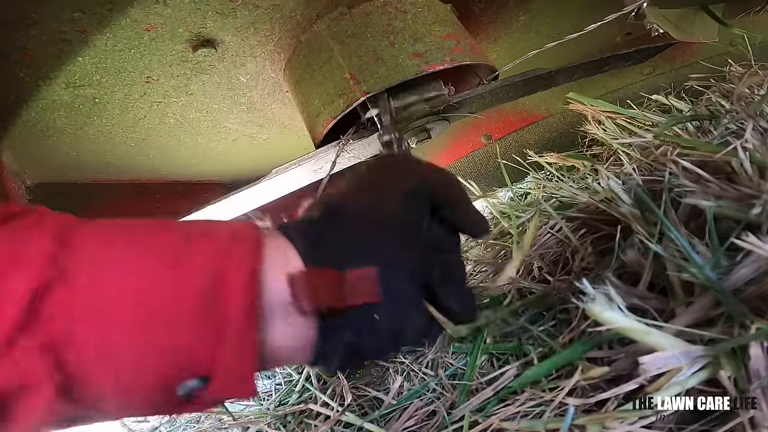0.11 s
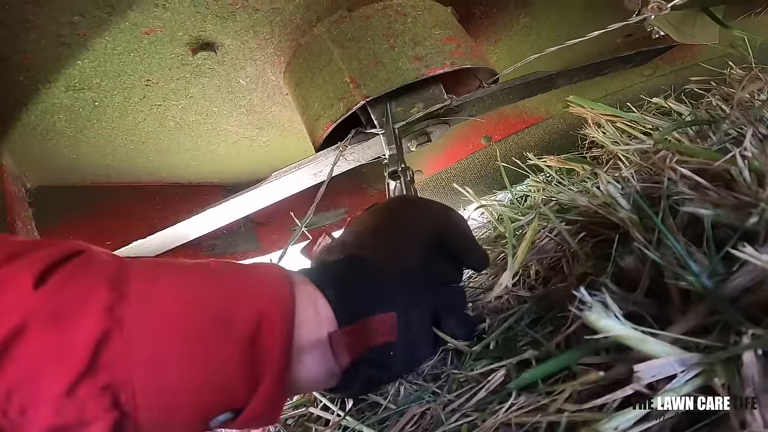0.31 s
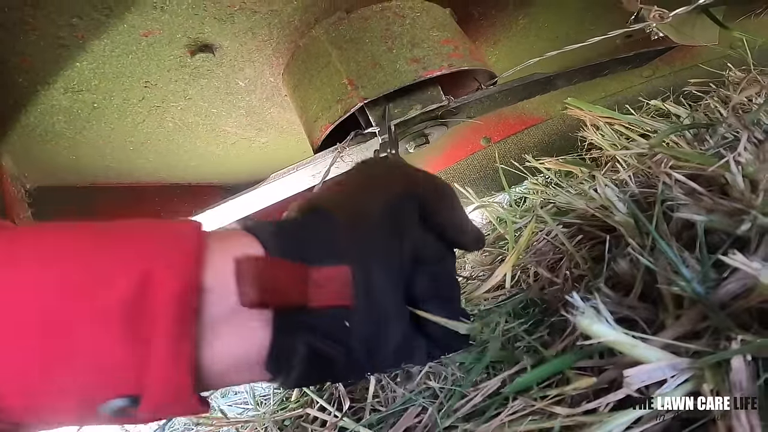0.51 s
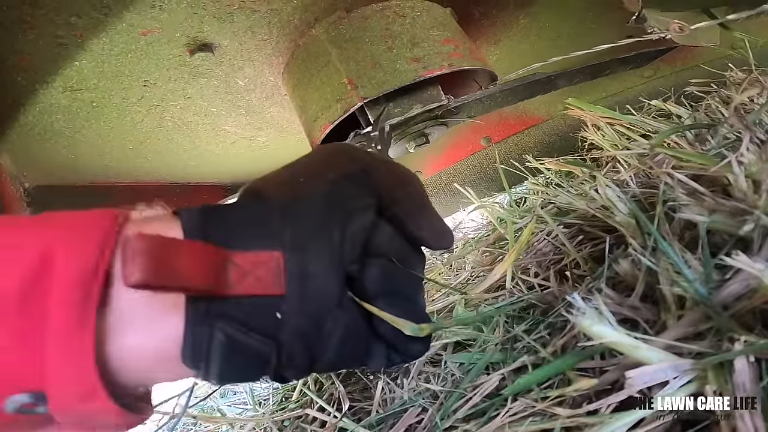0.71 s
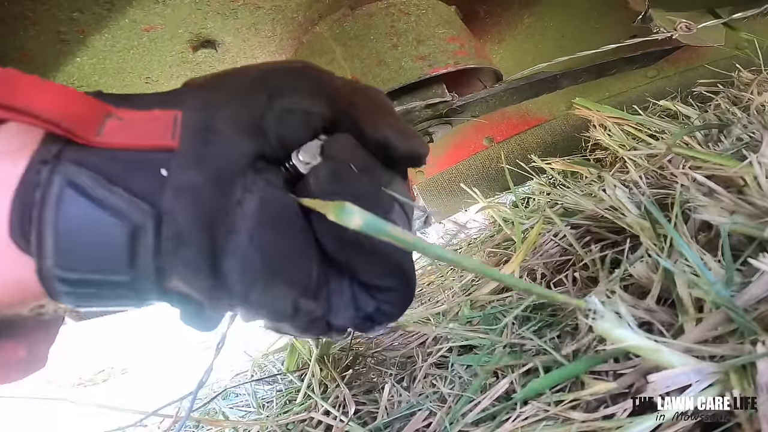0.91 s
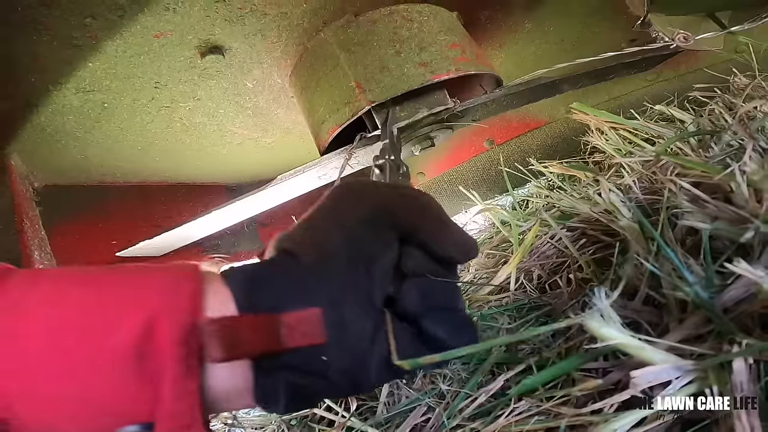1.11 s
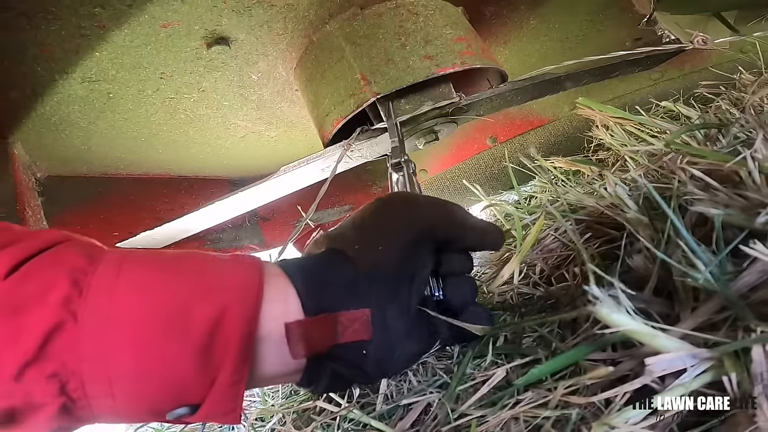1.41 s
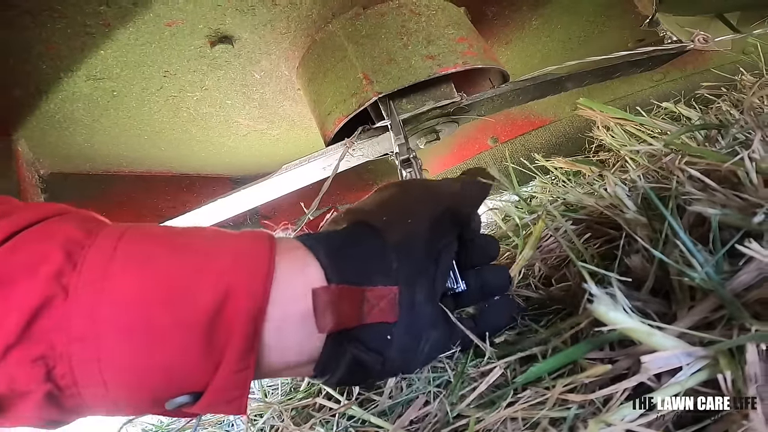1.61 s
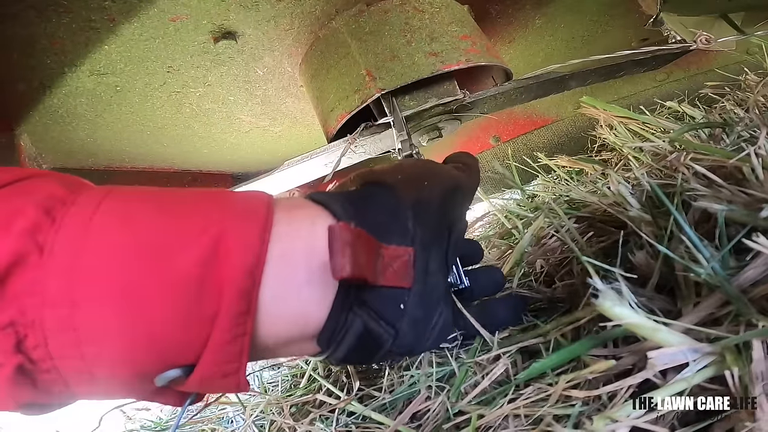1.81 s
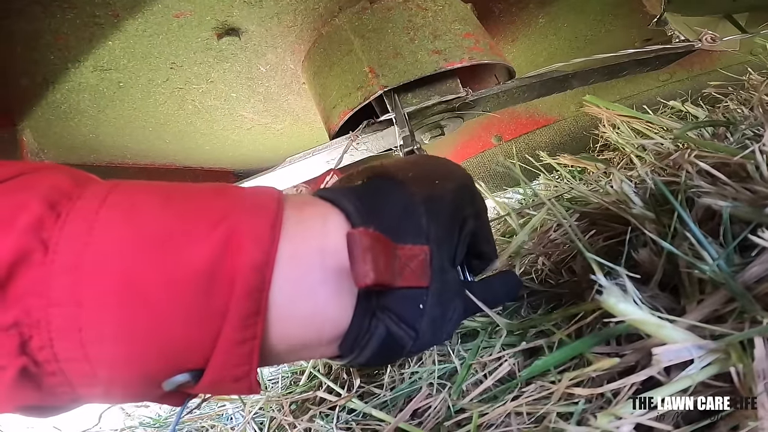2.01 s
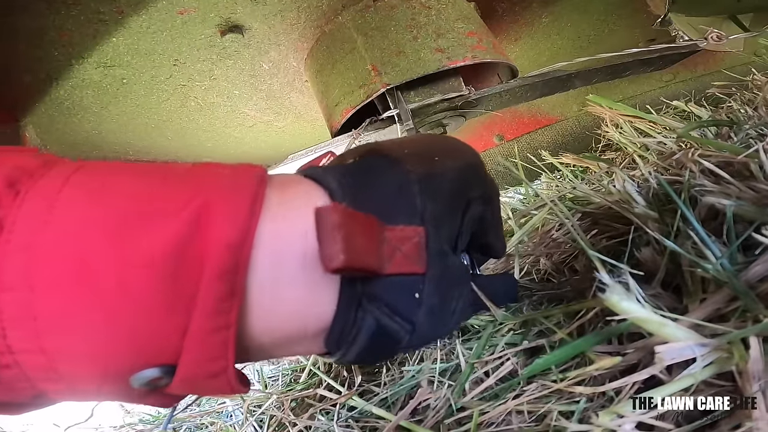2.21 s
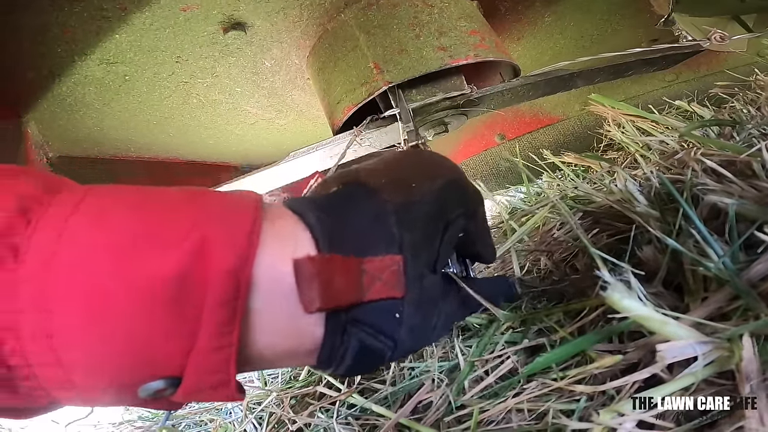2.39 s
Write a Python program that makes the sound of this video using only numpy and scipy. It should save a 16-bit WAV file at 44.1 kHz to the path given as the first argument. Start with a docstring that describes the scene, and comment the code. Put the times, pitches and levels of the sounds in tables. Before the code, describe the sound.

Wire pulled from a mower blade snaps loudly twice within the first second, each making the steel deck clang and boom; small scrapes and plier ticks follow, close to the microphone outdoors over a low hum.

```python
"""Barbed wire wound round a blade, under the steel deck of a field mower, snaps free twice.
Each snap is a crack of noise and a blow that sets the deck ringing; shoves on the deck make it boom.
Around the snaps the wire rasps over the steel in runs of tiny slips, zings briefly, and the pliers tick.
Behind this lie a low hum, a thin, steady hiss like insects in the grass, and a crackly rustle,
all made from noise shaped in pitch."""
import sys
import numpy as np
from scipy import signal
from scipy.fft import rfft, irfft
from scipy.io import wavfile

SR = 44100
rng = np.random.default_rng(int(sys.argv[2]) if len(sys.argv) > 2 else 0)


def materialize(psi):
    """Save the field psi as 16-bit PCM at rate SR to the path in sys.argv[1].

    A 1-D psi becomes a single channel; in a 2-D psi each row is a channel.
    """
    bounded = np.clip(np.atleast_2d(psi).T, -1, 1)
    quanta = np.round(bounded * 32767).astype(np.int16)
    wavfile.write(sys.argv[1], SR, quanta)


N = 110250
T = np.arange(N) / SR  # time of every sample, s
FREQS = np.maximum(np.arange(N // 2 + 1) * SR / N, 1)  # pitch of every spectrum step, Hz

# In every table t60 is the time to fade by 60 dB, and colours are relative levels.
# The wire snaps: (time [s], crack [dB], treble tilt [dB per octave], deck clang [dB],
# ring of the modes [dB], 1st, 3rd, 5th... modes over the others [dB],
# how long after the snap the wire presses again [s])
SNAPS = [(0.2297, -14.5, 0.5, 9, 8.5, 4.5, .2), (0.7051, -21, -2.5, 10, 3.5, -4.5, 0.49)]
# Colour of the crack: (pitch [Hz], level [dB per Hz])
CRACK_COLOUR = [(300, -8), (1200, -6), (2000, -13.5), (3400, 1), (7000, -8.5), (8100, -3.5), (10000, -19),
                (15000, -35)]
# Ringing of blade and deck, before each blow sets its strength: (pitch [Hz], level [dB], t60 [s])
DECK_MODES = [(571, -48, 1.0), (841, -49, .4), (918, -41, .33), (1114, -38, .3), (1372, -42, .36),
              (1435, -33, .1), (1470, -44, .75), (1530, -51, .8), (2034, -51, .3), (2305, -43, .16),
              (2773, -43, .13), (2922, -36.5, .17), (3293, -45, .12), (3910, -45, .12), (4165, -44, .2),
              (5657, -44, .13), (6020, -44, .11)]
# Dense clang of the deck's other modes: (pitch [Hz], level [dB per Hz])
CLANG_COLOUR = [(100, -9), (200, -1.5), (400, 0), (560, -1.5), (950, -1.5), (1480, 4.5), (1660, -26.5),
                (2200, 1), (3200, -26), (5000, -12.5), (8000, -20), (14000, -61)]
# How long that clang lasts: (pitch [Hz], t60 [s])
CLANG_T60 = [(900, .2), (3000, .15), (10000, .12)]
# The wire knocks and slides over steel: (time of peak [s], rise [s], fall [s], rasp [dB],
# treble tilt [dB per octave], drive of the deck [dB])
SCRAPES = [(0.138, 0.0095, 0.021, -34, -5, -44.5), (0.198, 0.0064, 0.053, -35, -3, -39),
           (0.23, 0.0073, 0.008, -22, -1, -15.5), (0.269, 0.026, 0.039, -47, 4.5, -32.5),
           (0.430, .004, 0.0097, -42, -1, -75), (0.475, 0.021, 0.056, -44, -2, -40.5),
           (0.612, 0.0076, 0.021, -43.5, 0, -47), (0.666, 0.049, 0.065, -46, -1, -42),
           (0.749, 0.016, 0.019, -36, -1, -35), (0.8532, 0.0024, 0.026, -34.5, -2.1, -34),
           (0.895, 0.0038, 0.0061, -29.5, -2.9, -29), (0.922, 0.0023, 0.011, -34.5, -2.5, -39),
           (1.144, 0.0019, 0.012, -45, -3.5, -46), (1.242, 0.003, 0.013, -40, -0.5, -48),
           (1.32, 0.011, 0.012, -24, 0, -27.5), (1.359, 0.012, 0.026, -36, 0.5, -39),
           (1.456, 0.036, 0.066, -46.5, -11, -50)]
# Colour of the rasp: (pitch [Hz], level [dB per Hz])
RASP_COLOUR = [(300, -1), (600, -16), (980, 3), (1700, -8.5), (3000, -3.5), (6200, -1.5), (7300, -12.5),
               (9000, -12), (12000, -22), (15000, -38)]
# How alike left and right are for contact sounds: (pitch [Hz], likeness [1 = same])
CONTACT_LIKENESS = [(200, 1), (700, 0.55), (1400, 0.92), (3200, 0.17), (7000, 0.051)]
# Sideways balance of contact sounds: (pitch [Hz], left over right [dB])
CONTACT_PAN = [(200, .5), (1000, 2), (6000, 2), (8500, -7), (14000, -6)]
# The taut wire zings as it slips: (time [s], level [dB], pitch [Hz], half length [s])
ZINGS = [(0.23, -17, 3300, 0.0036), (0.708, -22.5, 3680, 0.0026), (0.902, -41.5, 2256, 0.012),
         (1.319, -35, 2860, 0.014), (1.365, -38, 925, 0.021), (1.375, -40, 3946, 0.02)]
# Light ticks of pliers and barbs: (time [s], level [dB], pitch [Hz], half width [octaves],
# left over right [dB])
TICKS = [(0.8922, -3, 4950, 0.4, 2), (1.0330, -11.5, 3060, 0.8, 6.5), (1.2422, -11, 2450, 0.91, 4),
         (1.6824, -2.5, 2110, 0.22, -2)]
# Tugs and recoils shove the deck: (time [s], level [dB], pitch of the push [Hz])
SHOVES = [(0.002, -35.5, 194), (0.052, -39.5, 324), (0.232, -16.5, 68), (0.234, -19.5, 197.6),
          (0.722, -15, 207.5), (0.765, -27, 197), (0.850, -27, 189), (1.179, -27.5, 69),
          (1.318, -26.5, 265), (1.377, -28, 103.5)]
# Slow flexing of the deck: (pitch [Hz], level [dB], t60 [s])
PANEL_MODES = [(26.75, -57, 1.53), (91.94, -52, 0.95), (211, -42.5, 0.1), (232.2, -49.5, 0.51),
               (295, -54, 0.77), (388.2, -46.5, 0.45)]
# Glove and sleeve rustle in the grass: (pitch [Hz], level [dB per Hz])
RUSTLE_COLOUR = [(500, -9), (1200, 0), (1700, -4.5), (2300, 4.5), (5500, -4), (8000, -10), (14000, -22.5)]
# Rustle over time: (time [s], level [dB])
RUSTLE_LEVEL = [(0, -70.5), (.1, -55), (1.12, -63.5), (1.18, -56), (1.65, -57), (1.85, -61), (2.1, -54.5),
                (2.25, -67), (2.5, -67)]
# High outdoor hiss: (pitch [Hz], level [dB per Hz])
HISS_COLOUR = [(500, -20), (1200, -3), (1700, -7), (3300, -5.5), (4400, 2), (5400, 1), (7000, -10),
               (10000, -24), (15000, -52)]
# Sideways balance of the hiss: (pitch [Hz], left over right [dB])
HISS_PAN = [(700, -2), (4200, 9), (8000, 1), (14000, -42)]
# Low hum: (pitch [Hz], level [dB per Hz])
HUM_COLOUR = [(27, -10), (52, -0.5), (112, 1.5), (140, -8.5), (238, -10), (275, -21), (400, -24),
              (650, -38), (1500, -69)]
# Hum over time: (time [s], level [dB])
HUM_LEVEL = [(.42, -37), (.6, -39), (1.52, -40.5), (1.64, -45), (2.5, -44)]
# How alike left and right are in the background: (pitch [Hz], likeness [1 = same])
AIR_LIKENESS = [(100, 1), (290, 0.93), (700, 0.29), (9000, 0.12)]

CRACK_FALL_S, CLANG_RISE_S = 0.0072, 0.0026
MUFFLE_S = 0.029  # fade of the modes once the wire presses on the deck again
GRIP_RING_DB, GRIP_FALL_S = 3, .018  # the pressed wire damps the deck's modes
MODE_PAN_DB = 2.5  # left over right
SLIPS_PER_S, SLIP_SPREAD_DB = 5000, 0.5
JUDDER_STEPS_PER_S, JUDDER_DB = 160.8, 2  # random loudness steps, joined by lines
ZING_WIDTH_SHARE = 0.0413  # band width as a share of the pitch
SHOVE_CYCLES = 1.6  # a shove's fall time, counted in its own cycles
CRACKLES_PER_S, CRACKLE_SPREAD_DB = 2000, 2.4
HISS_DB = -54.5
LEFT_LAG_S = .00004
CUTOFF_HZ = 15500


def amp(db):
    """Turn decibels into a gain."""
    return 10 ** (np.asarray(db) / 20)


def unit(x):
    """Scale to an rms (average strength) of 1."""
    return x / np.sqrt(np.mean(x ** 2) + 1e-20)


def per_hz(points):
    """Read a table at every pitch, with straight lines over log frequency."""
    hz, value = np.transpose(points)
    return np.interp(np.log(FREQS), np.log(hz), value)


def level(points):
    """Turn a table of decibels over time into a gain."""
    return amp(np.interp(T, *np.transpose(points)))


def pan(db):
    """Give left and right gains for a level difference."""
    return amp(np.array([[.5], [-.5]]) * db)


def band_pass(x, edges):
    """Keep mainly the pitches between two edges in Hz."""
    edges = np.minimum(edges, SR / 2 - 1)
    return signal.sosfilt(signal.butter(2, edges, "band", fs=SR, output="sos"), x)


def white():
    """Make two unrelated noises."""
    return rng.standard_normal((2, N))


def grit(per_s=SLIPS_PER_S, spread_db=SLIP_SPREAD_DB):
    """Make tiny slips of uneven size at random moments."""
    sizes = amp(spread_db * np.minimum(rng.exponential(1, N), 4))
    happens = rng.random(N) < per_s / SR
    return white() * sizes * happens


def coloured(source, spectrum, likeness, pan_db=0, tilt_db=0):
    """Mix two unrelated signals into a stereo pair with this colour, at rms 1."""
    mid, side = rfft(source)
    alike = np.clip(per_hz(likeness), -.99, .99)
    # the shared part is equal on both sides, the other part has opposite signs
    pair = np.sqrt(1 + alike) * mid + np.sqrt(1 - alike) * side * [[1], [-1]]
    octaves = np.log2(np.maximum(FREQS, 200))  # no tilt below 200 Hz
    colour = amp(per_hz(spectrum) + tilt_db * octaves)
    return unit(irfft(pair * colour * pan(pan_db), N))


def contact(source, spectrum, tilt_db=0):
    """Colour a sound made where wire meets steel."""
    return coloured(source, spectrum, CONTACT_LIKENESS, per_hz(CONTACT_PAN), tilt_db)


def click(s):
    """Make a unit blow, one sample long, at this time."""
    return 1. * (np.arange(N) == int(s * SR))


def burst(start, fall):
    """Start suddenly, then fall exponentially."""
    return (T >= start) * np.exp(-np.maximum(T - start, 0) / fall)


def ringing(modes):
    """Add up the fading tones with which a body answers a unit click."""
    total = 0
    for k, (hz, db, t60) in enumerate(modes):
        sign = (-1) ** k
        total = total + sign * amp(db - 60 * T / t60) * np.sin(2 * np.pi * hz * T)
    return total


def through(force, response):
    """Drive a body with a force: every push starts its own copy of the response."""
    return signal.fftconvolve(np.atleast_2d(force), np.atleast_2d(response), axes=1)[:, :N]


def snaps(deck_clang):
    """Each snap is a gritty crack and one sharp blow; the modes ring until the wire presses again."""
    out = 0
    for s, crack_db, tilt_db, clang_db, ring_db, odd_db, free_for in SNAPS:
        crack = contact(white() + unit(grit()), CRACK_COLOUR, tilt_db)
        out = out + amp(crack_db) * crack * burst(s, CRACK_FALL_S)
        muffle = np.exp(-np.maximum(T - free_for, 0) / MUFFLE_S)  # time counts from the blow
        ring = amp(ring_db) * deck_modes(odd_db) * muffle
        out = out + through(click(s), amp(clang_db) * deck_clang + ring)
    return out


def deck_modes(odd_db):
    """The place of contact favours every other mode of blade and deck."""
    modes = []
    for k, (hz, db, t60) in enumerate(DECK_MODES):
        modes.append((hz, db + (-1) ** k * odd_db / 2, t60))
    return pan(MODE_PAN_DB) * ringing(modes)


def clang():
    """The deck's dense modes swell quickly, then fade at a rate set octave by octave."""
    noise = rfft(contact(white(), CLANG_COLOUR))
    octave = np.clip(np.log2(FREQS).astype(int), 8, 13)
    t60 = per_hz(CLANG_T60)
    tail = 0
    for k in np.unique(octave):
        inside = octave == k
        tail = tail + irfft(noise * inside, N) * amp(-60 * T / t60[inside].mean())
    swell = 1 - np.exp(-T / CLANG_RISE_S)
    return unit(tail) / np.sqrt(N) * swell / 2


def scrapes(deck):
    """Juddering runs of tiny slips are heard directly and through the deck they drive."""
    judder = np.interp(T * JUDDER_STEPS_PER_S, np.arange(N), rng.standard_normal(N))
    slips = unit(grit()) * amp(JUDDER_DB * judder)
    out, drive = 0, 0
    for s, rise, fall, db, tilt_db, deck_db in SCRAPES:
        before, after = np.minimum(T - s, 0), np.maximum(T - s, 0)
        stroke = np.exp(-(before / rise) ** 2 - after / fall)
        out = out + amp(db) * stroke * contact(slips, RASP_COLOUR, tilt_db)
        drive = drive + amp(deck_db) * stroke
    return out + through(drive * unit(slips[0]), deck)


def zings():
    """The slipping wire gives brief wavering tones: narrow noise held at an even strength."""
    out = 0
    for s, db, hz, length in ZINGS:
        edges = hz * (1 + np.array([-.5, .5]) * ZING_WIDTH_SHARE)
        wave = signal.hilbert(band_pass(white()[0], edges))
        tone = unit(np.cos(np.angle(wave)))  # keep the wavering pitch, drop the wavering strength
        out = out + amp(db) * tone * np.exp(-((T - s) / length) ** 2)
    return out


def ticks():
    """Dry clicks each sound through one broad resonance."""
    out = 0
    for s, db, hz, octaves, pan_db in TICKS:
        edges = hz * 2 ** (np.array([-1, 1]) * octaves)
        out = out + amp(db) * pan(pan_db) * band_pass(click(s) + 1e-18, edges)
    return out


def boom():
    """Each shove is a quickly damped thud that sets the deck's panels swinging."""
    thuds = 0
    for s, db, hz in SHOVES:
        thuds = thuds + amp(db) * burst(s, SHOVE_CYCLES / hz) * np.sin(2 * np.pi * hz * (T - s))
    return thuds + through(thuds, ringing(PANEL_MODES))


def rustle():
    """The moving hand rustles: many small crackles, coloured and a little to the left."""
    crackles = grit(CRACKLES_PER_S, CRACKLE_SPREAD_DB)
    return level(RUSTLE_LEVEL) * coloured(crackles, RUSTLE_COLOUR, AIR_LIKENESS, pan_db=1.5)


def hiss():
    """The high outdoor hiss is steady coloured noise."""
    return amp(HISS_DB) * coloured(white(), HISS_COLOUR, AIR_LIKENESS, per_hz(HISS_PAN))


def hum():
    """The low hum is deep coloured noise with a slowly changing level."""
    return level(HUM_LEVEL) * coloured(white(), HUM_COLOUR, AIR_LIKENESS)


def scene():
    """Add everything up; the work on the wire reaches the right microphone a little sooner."""
    deck_clang = clang()
    gripped_deck = deck_clang + amp(GRIP_RING_DB) * deck_modes(0) * burst(0, GRIP_FALL_S)
    left, right = snaps(deck_clang) + scrapes(gripped_deck) + zings() + ticks() + boom()
    work = np.array([np.interp(T - LEFT_LAG_S, T, left), right])
    return work + rustle() + hiss() + hum()


def record(dry):
    """Cut the top steeply with a low-pass filter."""
    return signal.sosfilt(signal.ellip(10, .2, 80, CUTOFF_HZ, fs=SR, output="sos"), dry)


dry = scene()
out = record(dry)
materialize(out)
```